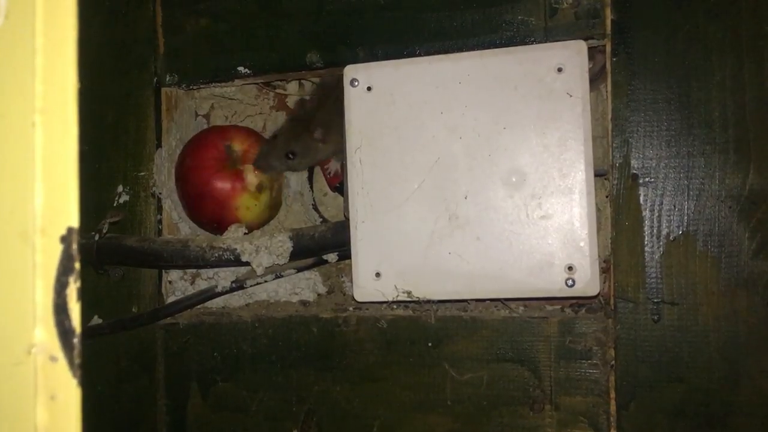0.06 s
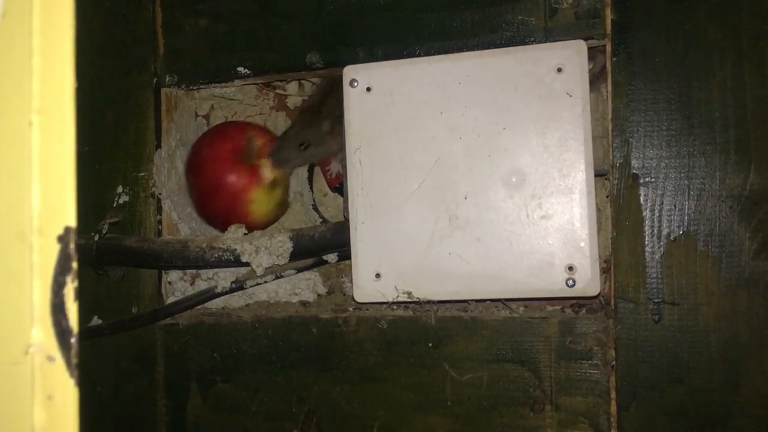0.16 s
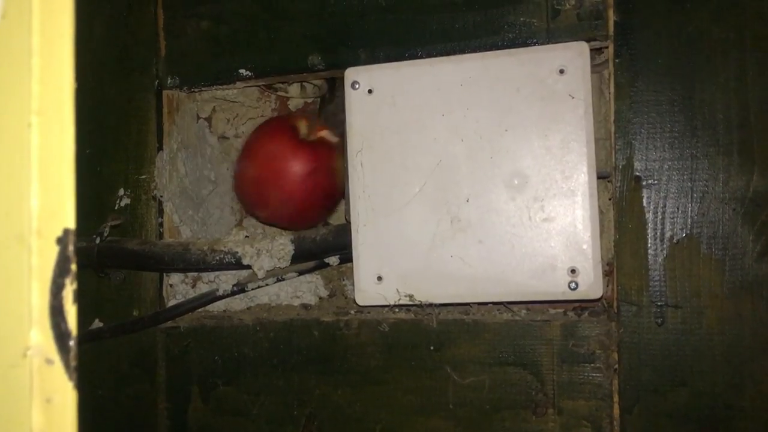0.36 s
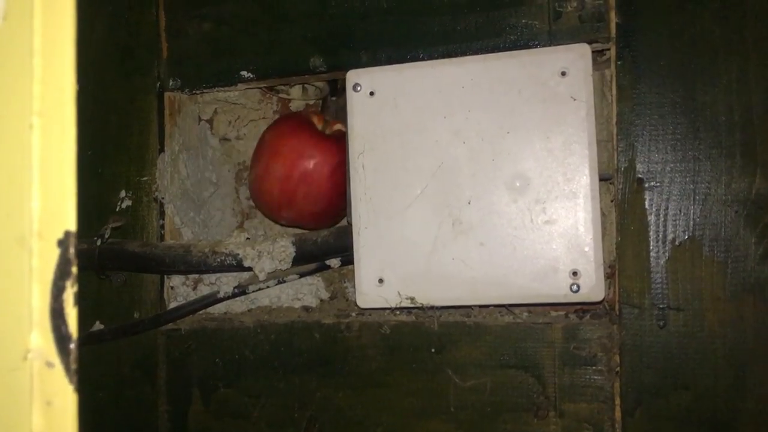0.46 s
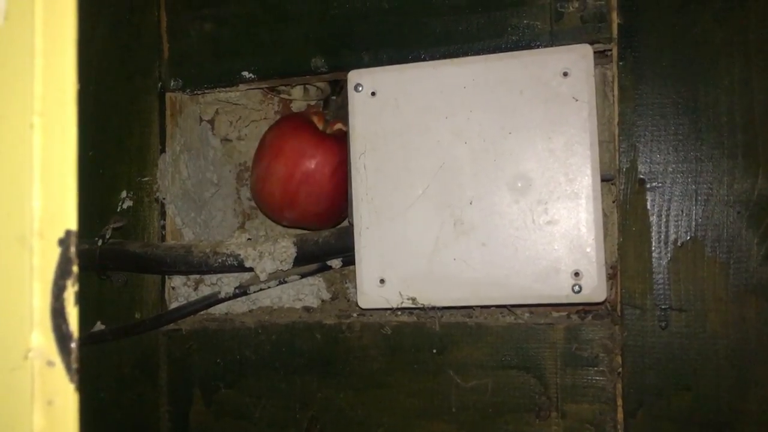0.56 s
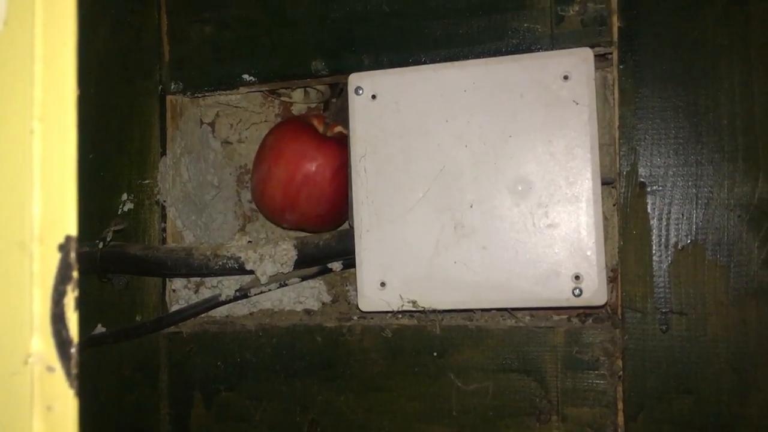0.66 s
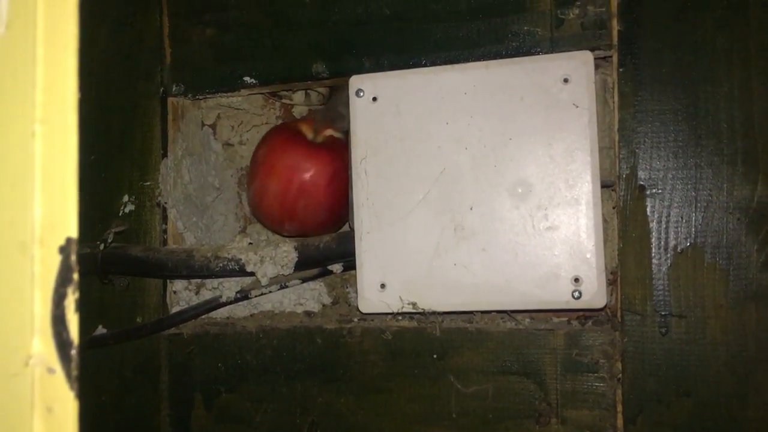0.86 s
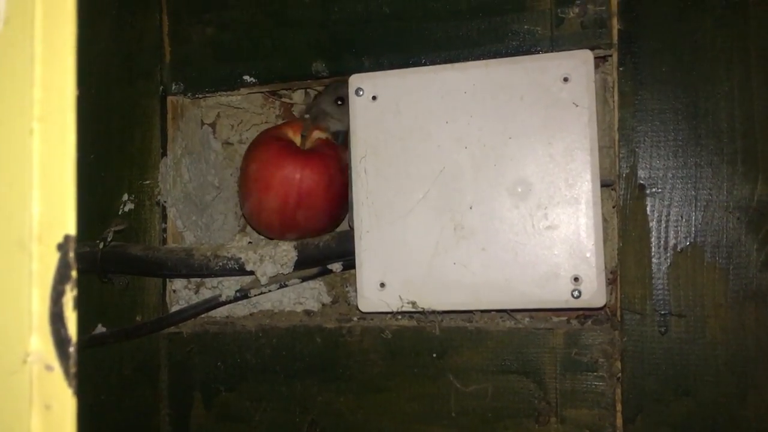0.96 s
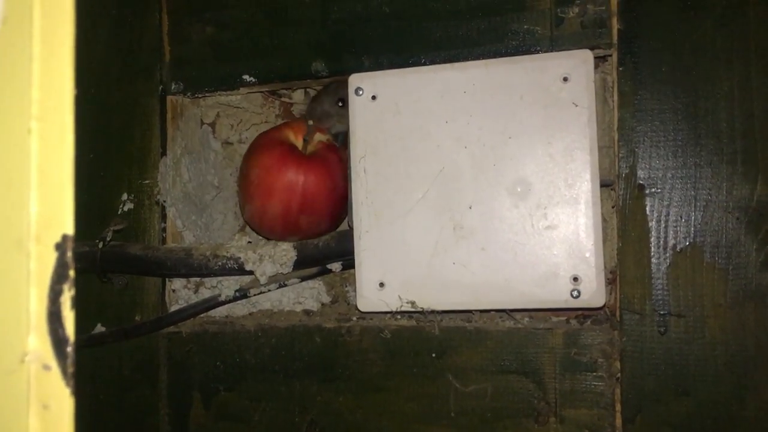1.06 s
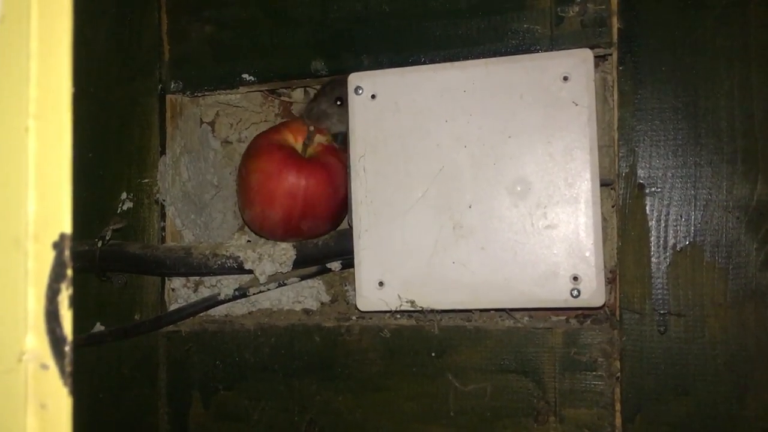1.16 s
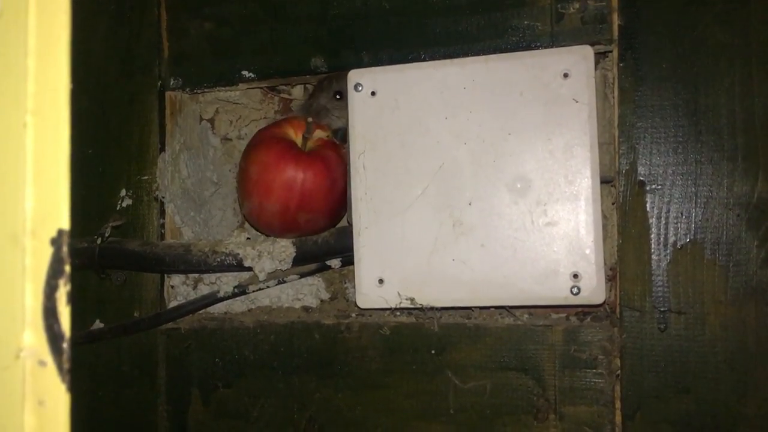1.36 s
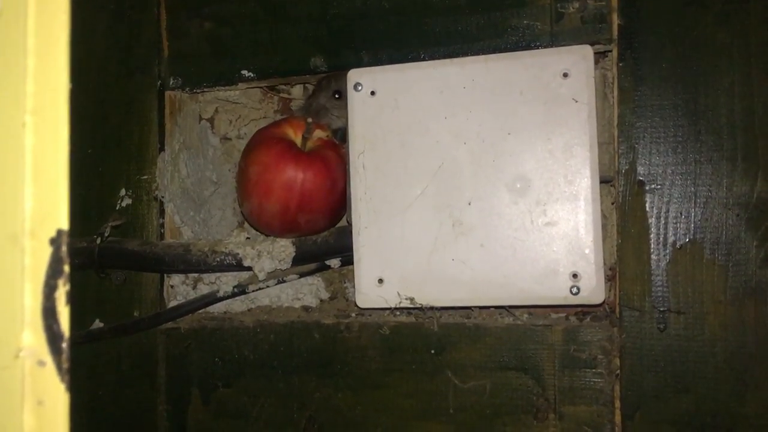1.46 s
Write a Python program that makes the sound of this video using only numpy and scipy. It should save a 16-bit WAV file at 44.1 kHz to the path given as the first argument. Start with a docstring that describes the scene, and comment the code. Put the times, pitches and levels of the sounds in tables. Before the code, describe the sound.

An apple bumps and scrapes over plaster, then gives several short, hollow knocks on a plastic cover as a rat pulls it. Claws and grit tick, and the movement dies away in a quiet room.

```python
"""An apple, tugged by a rat across a plaster wall recess, knocks against a plastic cover panel.
Each knock rings the panel and clatters in the recess. The apple's weight thuds softly as it rolls,
and its skin scuffs and hisses over the plaster in tiny slips, above a low dragging rumble.
Claws and grit tick. Behind it all lies the low tone of a small, quiet room."""
import sys
import numpy as np
from scipy import signal
from scipy.fft import rfft, irfft
from scipy.io import wavfile

SR = 44100
rng = np.random.default_rng(int(sys.argv[2]) if len(sys.argv) > 2 else 0)


def transcribe(signal):
    """Save signal, clipped to [-1, 1], as a 16-bit WAV file at the path in sys.argv[1]."""
    frames = np.atleast_2d(signal).T
    limited = np.clip(frames, -1, 1)
    pcm = np.round(limited * 32767).astype(np.int16)
    wavfile.write(sys.argv[1], SR, pcm)


N = 66150
TIME = np.arange(N) / SR

# EQ of the room tone: (frequency [Hz], relative level [dB])
ROOM_EQ = [(30, -0.5), (70, 14), (200, -1.5), (400, -10.5), (1000, -18), (3000, -19), (8000, -25),
           (16000, -29)]
# decay of the reflections in the recess: (frequency [Hz], t60 [s])
RECESS_DECAY = [(100, 0.15), (600, .11), (2000, 0.075), (6000, 0.059), (15000, 0.032)]
# sharp ticks of claws and grit: (time [s], level [dB])
TICK_CUES = [(0.084, -62.5), (0.499, -47), (0.5423, -35.5), (0.787, -57.5), (1.049, -37.5), (1.156, -53.5)]
# bright EQ of a tick: (frequency [Hz], relative level [dB])
TICK_EQ = [(500, -23), (1500, 4), (3500, 0.5), (4700, -5), (5800, 1.5), (7500, -6.5), (9700, 1.5),
           (11000, -9.5), (16000, -2.5)]
# fader moves of the steady drag: (time [s], rumble level [dB], rustle level [dB])
DRAG_FADERS = [(0, -53.5, -60), (.15, -68, -80.5), (.25, -59.5, -72.5), (.35, -57, -65), (.5, -56.5, -61.5),
               (.7, -52, -68.5), (.85, -55, -69.5), (1.0, -56.5, -65.5), (1.15, -56.5, -71),
               (1.35, -54.5, -71), (1.5, -71, -93)]
# bass-heavy EQ of the drag rumble: (frequency [Hz], relative level [dB])
RUMBLE_EQ = [(25, -29.5), (45, -0.5), (70, -1), (130, 3), (200, -4.5), (280, -3.5), (380, -17.5),
             (700, -25), (2000, -58)]
# gritty scuffs on the plaster: (time [s], attack [s], t60 [s], level [dB])
SCUFF_CUES = [(0.0, .018, 0.21, -65.5), (0.08, .01, 0.33, -70), (0.365, 0.024, 0.088, -56.5),
              (0.432, .015, .15, -74), (0.468, .01, 0.085, -63), (0.625, 0.016, 0.21, -60),
              (0.72, 0.011, 0.084, -61.5), (0.96, 0.033, 0.38, -57.5), (1.166, 0.0043, 0.18, -56.5),
              (1.2, 0.014, 0.16, -56.5), (1.26, 0.0087, 0.17, -69)]
# EQ of the rustle and scuffs: (frequency [Hz], relative level [dB])
SCUFF_EQ = [(300, 3), (900, -0.5), (1350, 5.5), (1700, 2.5), (2600, -5.5), (3500, 0), (5000, -8.5),
            (9000, -8), (11000, -13.5), (16000, -13.5)]
# apple skin sliding on plaster: (time [s], attack [s], t60 [s], level [dB])
SLIDE_CUES = [(0.274, 0.0093, 0.1, -53.5), (0.295, 0.019, 0.22, -58), (1.039, 0.0063, .08, -49)]
# hissy EQ of a slide: (frequency [Hz], relative level [dB])
SLIDE_EQ = [(500, -18), (2000, -12), (3300, 2.5), (4600, -5.5), (5800, -0.5), (8000, -7), (9600, -4),
            (10800, -13.5), (16000, -20)]
# soft bumps of the rolling apple and the paws: (time [s], pitch [Hz], level [dB], t60 [s])
BUMP_CUES = [(0.070, 75, -51.5, 0.16), (0.199, 96, -33.5, 0.052), (0.353, 205.6, -33, 0.061),
             (0.408, 66, -41.5, 0.13), (0.494, 131, -29.5, 0.071), (0.547, 79.6, -36.5, 0.18),
             (0.622, 131, -32.5, 0.084), (0.788, 105.6, -34.5, 0.11), (0.819, 157.5, -39.5, 0.16),
             (0.905, 92, -54, .15), (0.990, 204.6, -34.5, 0.073), (1.030, 120, -37, 0.11),
             (1.105, 114.6, -44.5, 0.16), (1.202, 104, -30, 0.083), (1.254, 126, -37, 0.059),
             (1.330, 69.6, -36.5, 0.13)]
# resonances of the plastic panel: (frequency [Hz], relative level [dB], t60 [s])
PANEL_MODES = [(118.3, -5.5, 0.61), (281.2, -3.5, 0.41), (520.9, -4.5, 0.2), (537.6, -9, 0.16),
               (626, -13.5, .25), (681.4, -5.5, 0.2), (724, -17, 0.23), (792, -12, 0.17), (1008, -11, 0.26),
               (1153, -13, 0.27), (1715, -7, 0.14), (1860, -13, 0.14), (2002, -2, 0.097), (3272, -8, 0.12)]
# EQ of the clatter in the recess: (frequency [Hz], relative level [dB])
CLATTER_EQ = [(100, -6.5), (250, 13.5), (400, -2), (600, 7), (1000, 0.5), (1400, -5), (1900, -2.5),
              (2600, -14), (3500, -2), (5000, -15), (9000, -12), (16000, -22)]
# the apple hits the panel: (time [s], ring gain [dB], ring roll-off [Hz], clatter gain [dB])
KNOCK_CUES = [(0.481, -46, 890, -43.5), (0.499, -58, 500, -72), (0.5424, -37, 3500, -30.5),
              (0.614, -47, 690, -43), (0.787, -48, 350, -53), (0.985, -52.5, 1500, -52),
              (1.050, -56.5, 4000, -46.5), (1.197, -47.5, 1020, -41), (1.311, -52, 406, -52.5)]


def from_db(db):
    """Decibels to gain."""
    return 10 ** (np.asarray(db) / 20)


def curve_at(points, hz):
    """Read a curve on a log-frequency axis."""
    point_hz, values = np.transpose(points)
    return np.interp(np.log(np.maximum(hz, 1)), np.log(point_hz), values)


def equalised(x, eq):
    """Shape a signal with an EQ curve and bring it to unit RMS."""
    hz = np.arange(N + 1) * SR / (2 * N)
    shaped = irfft(rfft(x, 2 * N) * from_db(curve_at(eq, hz)))[:N]
    return shaped / np.sqrt(np.mean(shaped ** 2) + 1e-20)


def noise(eq):
    """Steady coloured noise at unit RMS."""
    return equalised(rng.standard_normal(N), eq)


def decay(age, t60):
    """Exponential fade, 60 dB down after t60 seconds."""
    return np.exp(-np.log(1000) * age / t60)


def since(start):
    """Seconds since a cue, zero before it."""
    return np.maximum(TIME - start, 0)


def softened(x, hz):
    """A one-pole low-pass: the gentle treble roll-off of a soft contact."""
    pole = np.exp(-2 * np.pi * hz / SR)
    return signal.lfilter([1 - pole], [1, -pole], x + 1e-18)


def swells(cues):
    """Envelope of a run of strokes, each ramping up and dying away."""
    return sum(from_db(db) * np.minimum(since(start) / attack, 1) * decay(since(start + attack), t60)
               for start, attack, t60, db in cues)


def room_tone(level_db=-65):
    """The quiet room: a steady, low bed of noise."""
    return from_db(level_db) * noise(ROOM_EQ)


def recess_burst(start, eq, attack_s=0.001, tail_db=-15.5):
    """One click as dense reflections in the recess, treble dying first, then a faint room tail."""
    age, reflections = since(start), 0
    spectrum = rfft(noise(eq))
    hz = np.arange(len(spectrum)) * SR / N
    centres, t60s = np.transpose(RECESS_DECAY)
    for solo, t60 in zip(np.eye(len(centres)), t60s):
        band_gain = curve_at(np.c_[centres, solo], hz)  # crossfades into the neighbouring bands
        reflections += decay(age, t60) * irfft(spectrum * band_gain, N)
    tail = softened(noise(eq), hz=2970) * from_db(tail_db) * decay(age, t60=0.29)
    return (reflections + tail) * (1 - np.exp(-age / attack_s))


def claw_and_grit_ticks():
    """Hard little contacts, bright and short, reflected in the recess."""
    return sum(from_db(db) * recess_burst(start, TICK_EQ) for start, db in TICK_CUES)


def friction(eq, slips_per_s=2500, spread_db=4):
    """A grainy texture: dense tiny slips of uneven size, smeared by the recess."""
    slips = (rng.random(N) < slips_per_s / SR) * rng.choice([-1, 1], N)
    sizes = from_db(spread_db * np.minimum(rng.exponential(1, N), 4))
    smear = rng.standard_normal(N) * decay(TIME, t60=0.027)
    return equalised(signal.fftconvolve(slips * sizes, smear)[:N], eq)


def apple_drag():
    """The apple rubs over plaster: low rumble and fine rustle, with single scuffs and hissing slides."""
    times, rumble_db, rustle_db = np.transpose(DRAG_FADERS)
    rumble = from_db(np.interp(TIME, times, rumble_db)) * noise(RUMBLE_EQ)
    rustle_gain = from_db(np.interp(TIME, times, rustle_db))
    scrape = np.hypot(rustle_gain, swells(SCUFF_CUES)) * friction(SCUFF_EQ)  # the two add in power
    hiss = swells(SLIDE_CUES) * friction(SLIDE_EQ)
    return rumble + scrape + hiss


def rolling_bumps(attack_s=0.005):
    """The apple's weight and the paws land as dull thuds, each one low, quickly damped tone."""
    out = 0
    for start, hz, db, t60 in BUMP_CUES:
        age = since(start)
        envelope = (1 - np.exp(-age / attack_s)) * decay(age, t60)
        out += from_db(db) * envelope * np.sin(2 * np.pi * hz * age)
    return out


def panel_knocks(mode_spread_db=1.34):
    """The apple rings the panel and clatters in the recess, each knock at its own level and tone."""
    out = 0
    for start, ring_db, rolloff_hz, clatter_db in KNOCK_CUES:
        age, ring = since(start), 0
        variation_db = rng.normal(0, mode_spread_db, len(PANEL_MODES))
        for k, (hz, db, t60) in enumerate(PANEL_MODES):
            gain = (-1) ** k * from_db(db + variation_db[k])  # modes alternate in polarity
            ring += gain * np.sin(2 * np.pi * hz * age) * decay(age, t60)
        out += from_db(ring_db) * softened(ring, rolloff_hz)
        out += from_db(clatter_db) * softened(recess_burst(start, CLATTER_EQ), rolloff_hz * 2.26)
    return out


def scene():
    """Mono mix of the apple and the ticks over the room tone."""
    return (panel_knocks() + rolling_bumps() + claw_and_grit_ticks() + apple_drag() + room_tone())[None]


def record(dry):
    """A steep high cut takes the very top off the mix."""
    cutoff_hz = 15900
    high_cut = signal.ellip(12, 0.1, 80, cutoff_hz, fs=SR, output="sos")
    return signal.sosfilt(high_cut, dry)


dry = scene()
out = record(dry)
transcribe(out)
```